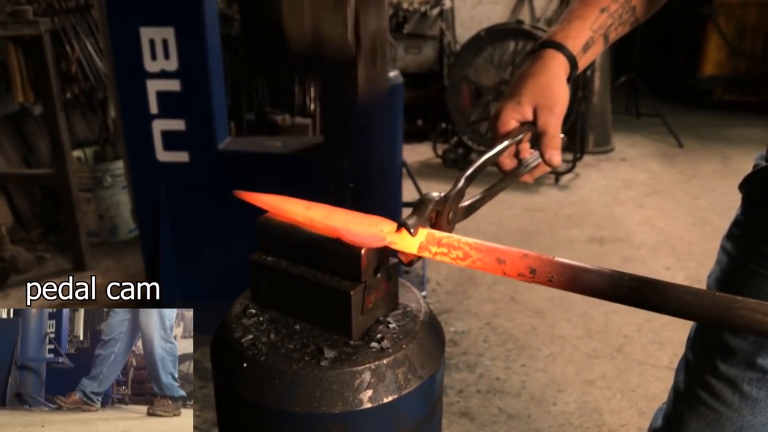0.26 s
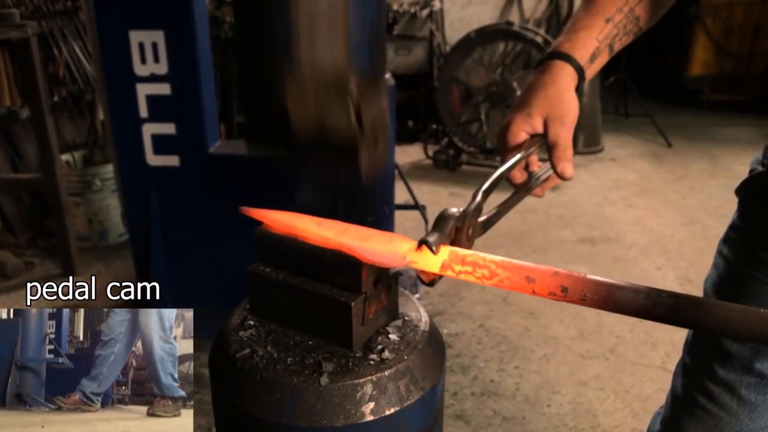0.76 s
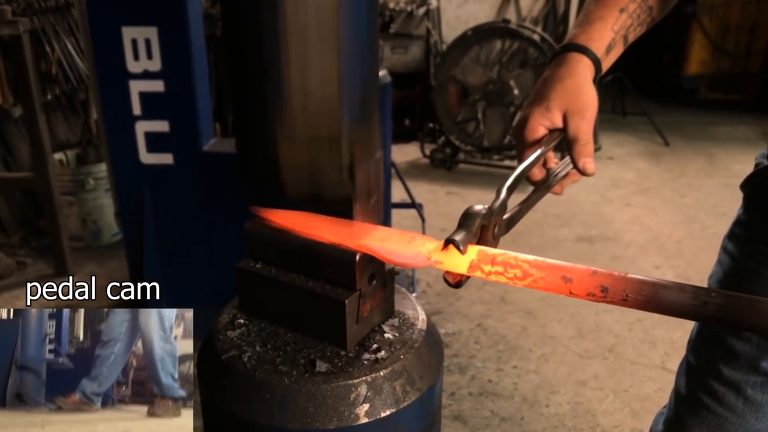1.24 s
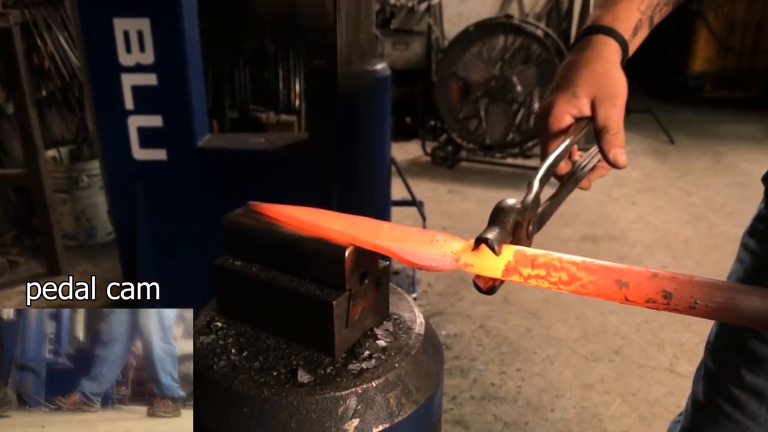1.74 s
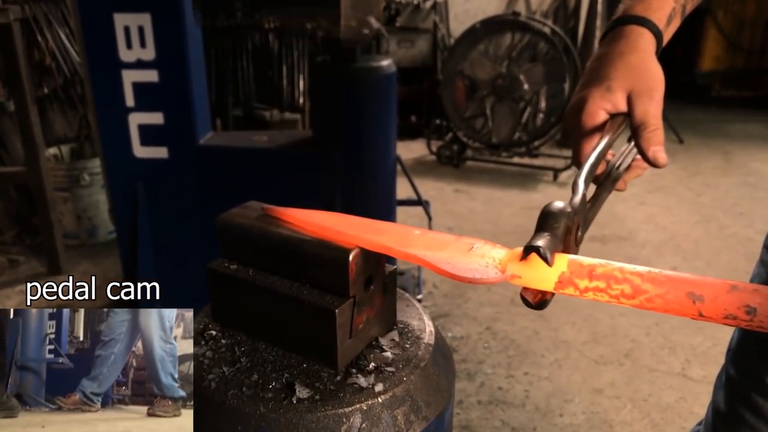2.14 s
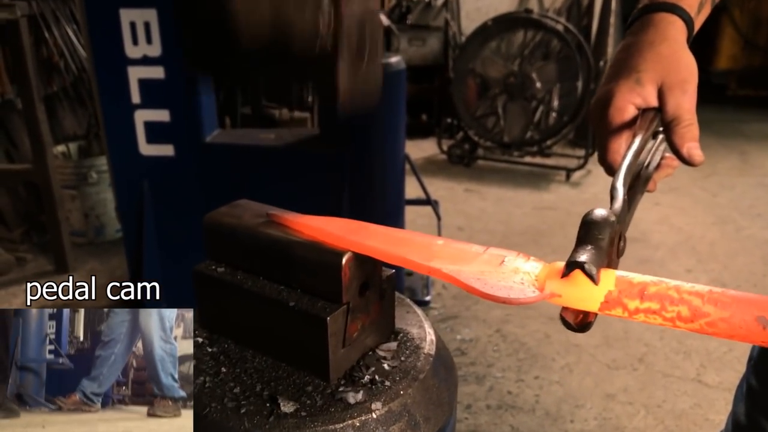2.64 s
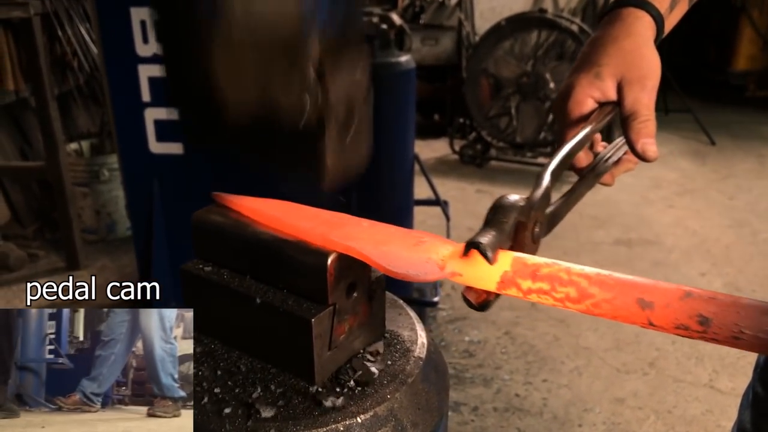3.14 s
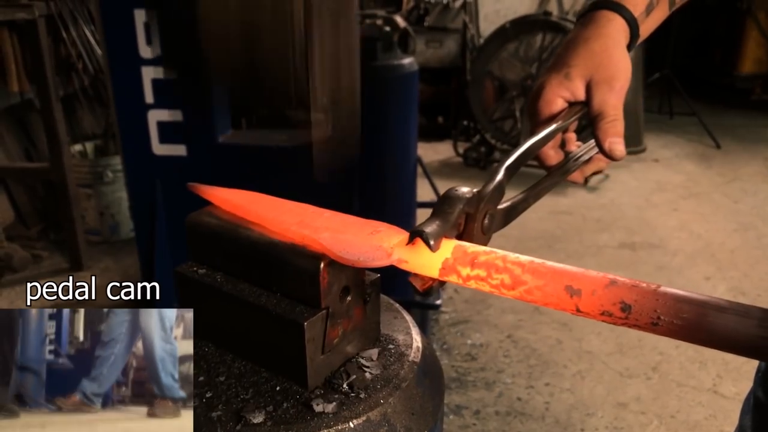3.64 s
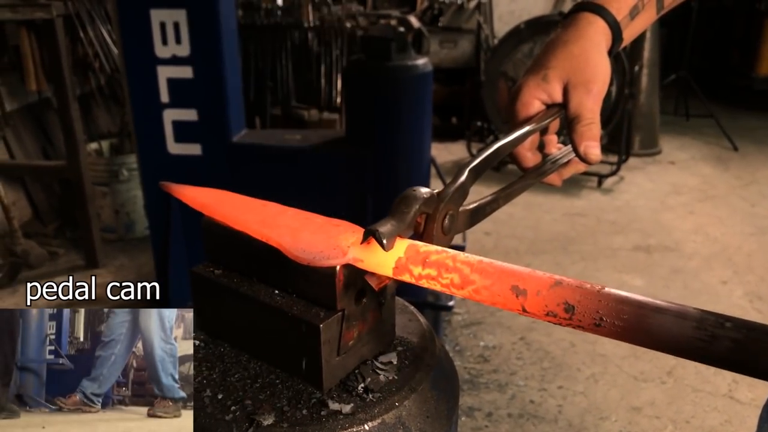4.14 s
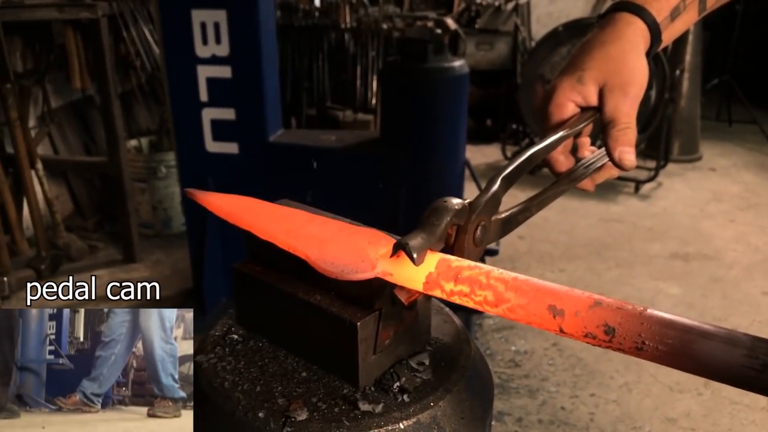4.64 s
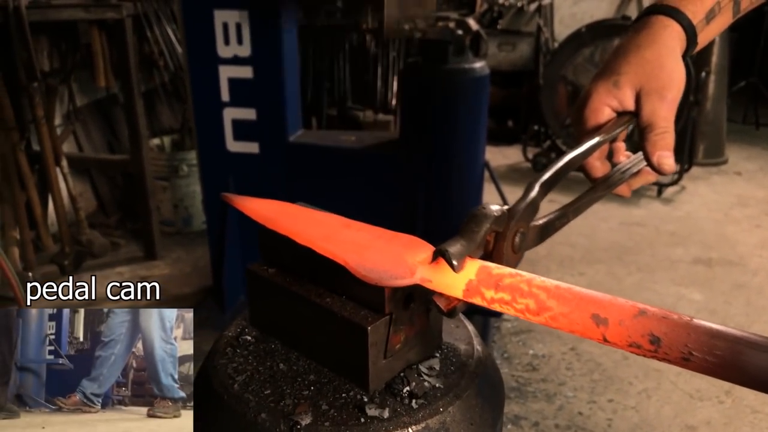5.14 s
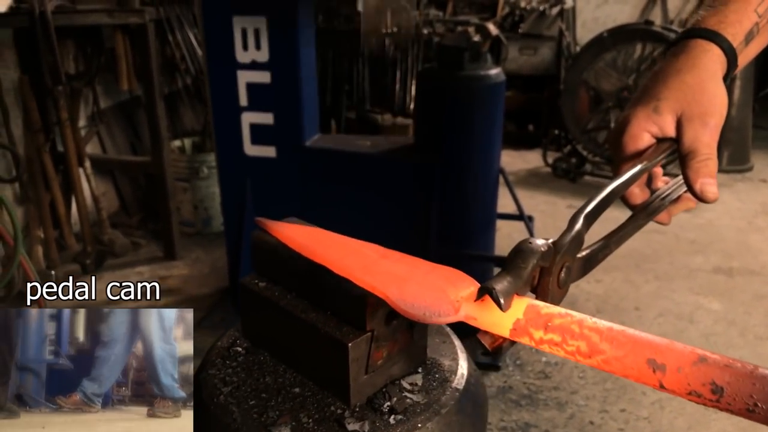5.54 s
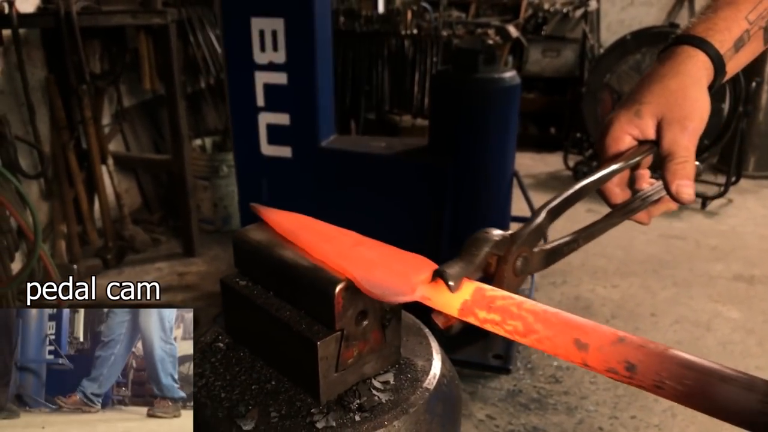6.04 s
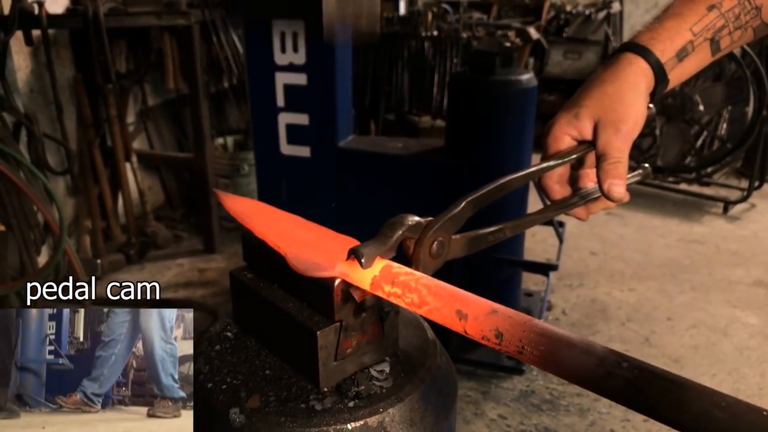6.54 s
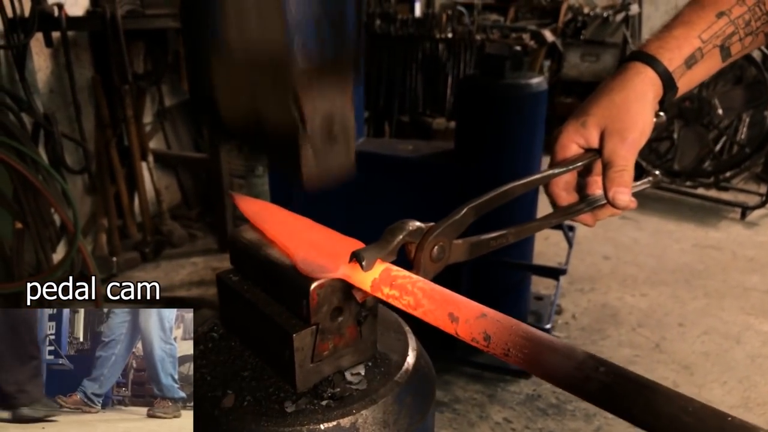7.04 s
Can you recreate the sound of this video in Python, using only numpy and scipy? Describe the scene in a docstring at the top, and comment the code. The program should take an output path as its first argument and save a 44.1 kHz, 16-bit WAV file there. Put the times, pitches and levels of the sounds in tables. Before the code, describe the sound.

Rapid, even clanging blows of a pneumatic forging hammer, with short spits of air and light metal rattles over a motor and fans.

```python
"""Power hammer in a forge

One microphone on the shop floor, near a pneumatic hammer drawing out a hot steel blade, nearly four
blows a second. Each cycle the air valve spits, air hisses as the ram comes down, and the dies crash
together: the frame booms, the anvil block and thin steel parts ring, and blade and tongs rattle.
Behind it the shop reverberates over the steady noise of motor and fans."""
import sys
import numpy as np
from scipy import signal
from scipy.fft import rfft, irfft
from scipy.io import wavfile

SR = 44100
rng = np.random.default_rng(int(sys.argv[2]) if len(sys.argv) > 2 else 0)


def transcribe(signal):
    """Save signal, clipped to [-1, 1], as a 16-bit WAV file at the path in sys.argv[1]."""
    frames = np.atleast_2d(signal).T
    limited = np.clip(frames, -1, 1)
    pcm = np.round(limited * 32767).astype(np.int16)
    wavfile.write(sys.argv[1], SR, pcm)


N = 321472
AGE = np.arange(SR) / SR   # seconds since a contact


def from_db(db):
    """Decibels to gain."""
    return 10 ** (np.asarray(db) / 20)


def fade(t60_s, hold_s=0):
    """Envelope that holds, then dies by 60 dB in t60_s."""
    return from_db(-60 * np.maximum(AGE - hold_s, 0) / t60_s)


def coloured(white, spectrum):
    """Gives unit white noise a spectrum in dB per Hz, rolling off below its first point."""
    size = white.shape[-1]
    hz, db = np.transpose(spectrum)
    bins = np.maximum(np.fft.rfftfreq(size, 1 / SR), 1)
    gain = from_db(np.interp(np.log(bins), np.log(hz), db)) * np.minimum(bins / hz[0], 1) ** 2
    return irfft(rfft(white) * gain, size) * np.sqrt(SR / 2)


def dense_modes(spectrum, repeat_share=0.72, repeat_below_hz=1800, clump_hz=110.3, clump_db=2):
    """One crowd of modes per blow: the lows mostly repeat, the highs change with each contact."""
    hz = np.fft.rfftfreq(SR, 1 / SR)
    same = rfft(rng.standard_normal(SR))
    fresh = rfft(rng.standard_normal((len(BLOWS), SR)))
    # each contact favours other clumps of modes
    favour_db = clump_db * rng.standard_normal((len(BLOWS), 512))
    clumps = from_db([np.interp(hz / clump_hz, np.arange(len(row)), row) for row in favour_db])
    fresh = fresh * clumps / np.sqrt(np.mean(clumps ** 2))
    share = repeat_share / (1 + (hz / repeat_below_hz) ** 2)
    return coloured(irfft(np.sqrt(share) * same + np.sqrt(1 - share) * fresh, SR), spectrum)


def ringing(modes, swell_s, spread_db=1.1):
    """One ring per blow, swelling as the shock spreads; each blow weights the modes differently."""
    shapes = np.array([np.sin(2 * np.pi * hz * AGE) * from_db(db) * fade(t60) for hz, db, t60 in modes])
    weights = from_db(spread_db * rng.standard_normal((len(BLOWS), len(modes))))
    return weights @ shapes * (1 - np.exp(-AGE / swell_s))


def place(times, levels_db, sounds):
    """Lays one sound at each time."""
    out = np.zeros(N + 2 * SR)
    for s, db, sound in zip(times, levels_db, sounds):
        start = max(round(s * SR), 0)
        out[start:start + SR] += from_db(db) * sound
    return out[:N]


# Room tone of the forge: pitch_hz, level_db_per_hz
MACHINERY_SPECTRUM = [(25, -75), (70, -71), (115, -54.5), (190, -60), (280, -63), (380, -84.5), (800, -77),
                      (1300, -74.5), (2500, -78), (6000, -78.5), (10000, -82.5), (13000, -80), (16000, -89)]

def machinery():
    """Motor and fans run steadily in the background."""
    return coloured(rng.standard_normal(N), MACHINERY_SPECTRUM)


# Standing waves of the shop, all around the microphone: pitch_hz, level_db, t60_s
STANDING_WAVES = [(76.5, -37, 0.84), (107.7, -32.5, 0.83), (151.2, -45, 1), (163.5, -30, 0.74),
                  (183.6, -42, 0.56), (210.7, -28, 0.59), (240.7, -36, 0.94), (280, -35.5, 0.83)]

def room_boom():
    """Standing waves build up slowly after each blow and carry over into the next."""
    times, crash_db, _ = np.transpose(BLOWS)
    return place(times, crash_db, ringing(STANDING_WAVES, swell_s=0.024))


# The blade meeting the lower die: pitch_hz, level_db_per_hz
CLACK_SPECTRUM = [(500, -54), (1600, -32.5), (2800, -44), (5500, -43.5), (8000, -56), (15000, -66)]

def clacks(times, level_db):
    """Hot steel is soft, so each contact is a short, dead clack."""
    noise = coloured(rng.standard_normal((len(times), SR)), CLACK_SPECTRUM)
    return place(times, level_db, noise * fade(t60_s=0.043, hold_s=0.002))


# Knocks that reach the microphone clearly between blows: start_s, level_db
BLADE_KNOCKS = [(0.1586, -23), (1.2487, -17), (2.532, -23), (3.317, -24), (4.775, -20.5), (5.0555, -21)]

def blade_and_tongs():
    """Blade and tongs drop back on the die: a few clear knocks, and two light clacks after each blow."""
    knocks = clacks(*np.transpose(BLADE_KNOCKS))
    blows = np.repeat(np.array(BLOWS)[:, 0], 2)
    delay, force = rng.random((len(blows), 2)).T
    rattle = clacks(blows + 0.06 + 0.072 * delay, -33 + 11 * force)
    return knocks + rattle


# Air at the hammer, the valve's spit and the hiss driving the ram: pitch_hz, level_db_per_hz
SPIT_SPECTRUM = [(300, -45), (1300, -38), (2200, -35), (4000, -42), (6000, -34), (7600, -33), (8800, -32.5),
                 (10000, -41), (15500, -42)]
HISS_SPECTRUM = [(30, -68), (250, -65), (500, -78.5), (1400, -68.5), (4000, -81), (7000, -75.5),
                 (8200, -88.5), (8750, -77), (9500, -85), (13000, -83.5), (16000, -95)]

def air_valve(lead_s=0.0447, opening_s=0.003):
    """Between two blows: a short spit as the valve opens, then a hiss while air drives the ram down."""
    blows = np.array(BLOWS)[:, 0]
    times = blows[1:] - lead_s - opening_s
    wait_s = np.diff(blows)
    spit_db = -27.5 + 150 * (wait_s - wait_s.mean())   # a longer wait builds more pressure
    white = rng.standard_normal((len(times), 2, SR))
    opening = np.minimum(AGE / opening_s, 1) ** 2
    spit = coloured(white[:, 0], SPIT_SPECTRUM) * opening * fade(t60_s=0.028, hold_s=opening_s)
    hiss = coloured(white[:, 1], HISS_SPECTRUM) * opening * fade(t60_s=0.08, hold_s=0.047)
    return place(times, spit_db, spit) + place(times, np.zeros(len(times)), hiss)


# How freely the anvil and the thin steel ring: time_s, anvil_db, steel_db
RING_FREEDOM = [(0, 0, -7), (1.4, 0.5, -0.5), (2.7, 1, 2), (3.3, -2.5, 2), (4.37, -4, 6), (4.95, 2.5, 1),
                (5.45, 1.5, 3), (6.55, -3.5, 4), (7.2, -3.5, 3)]

def ring_levels(times):
    """The blade damps the anvil and the thin steel differently as it is moved along the die."""
    s, anvil_db, steel_db = np.transpose(RING_FREEDOM)
    return np.interp(times, s, anvil_db), np.interp(times, s, steel_db)


# The hammer from nearby, part by part from the floor up: pitch_hz, level_db, t60_s
FLOOR_THUD = [(32.7, -26, 0.18), (48.5, -18.5, 0.16), (58.5, -25.5, 0.23)]
FRAME_BOOM = [(116.2, -8.5, 0.2), (127.6, -18, 0.17), (173.4, -17, 0.36), (224.6, -20.5, 0.17),
              (232.9, -12.5, 0.19), (282.8, -18, 0.19), (327.4, -9.5, 0.14), (451, -23, 0.24),
              (523.2, -11.5, 0.15), (562, -25.5, 0.36), (634.4, -24.5, 0.46)]
ANVIL_RING = [(659.1, -6.5, 0.23), (705.4, -17.5, 0.17), (840, -22, 0.15), (883, -10, 0.094),
              (944, -18.5, 0.23), (982.5, -12, 0.36), (1036, -26, 0.41), (1159, -31, 0.3)]
DIE_RING = [(1344, -21, 0.38), (1465, -22, 0.28), (1968, -19.5, 0.16), (2386, -23, 0.15), (3570, -28, 0.2),
            (4218, -20, 0.15), (6760, -45, .3), (8340, -40, 0.3), (8550, -32, 0.3)]
THIN_STEEL_RING = [(1318, -40.5, 1.74), (1592, -38.5, 1.2), (1650, -42.5, 1.55), (1706, -45.5, 1.4),
                   (2120, -36.5, 0.87), (2140, -43, 0.78), (2970, -45.5, 1.1), (3126, -39.5, 1.2),
                   (3250, -48, 1.5), (3980, -44.5, 1.1), (4930, -43.5, 1.5), (5980, -42.5, 0.87),
                   (7420, -39, .5), (15600, -52, .9)]

def hammer_body():
    """Every blow shakes the floor and rings the frame, the anvil block, the dies and thin steel parts."""
    times, crash_db, thud_db = np.transpose(BLOWS)
    anvil_db, steel_db = crash_db + ring_levels(times)
    die_db = 1 + 1.4 * anvil_db   # the dies touch the blade, so their ring swings further
    floor = place(times, thud_db, ringing(FLOOR_THUD, swell_s=0.016))
    frame = place(times, crash_db, ringing(FRAME_BOOM, swell_s=0.0085))
    anvil = place(times, anvil_db, ringing(ANVIL_RING, swell_s=0.012))
    dies = place(times, die_db, ringing(DIE_RING, swell_s=0.0055))
    steel = place(times, steel_db, ringing(THIN_STEEL_RING, swell_s=0.0035))
    return floor + frame + anvil + dies + steel


# Near to far: crack of the dies, clang of the machine, shop reverberation: pitch_hz, level_db_per_hz
CRACK_SPECTRUM = [(100, -49), (500, -44), (1400, -49.5), (3000, -50), (4200, -50), (6000, -52.5),
                  (9000, -53.5), (15000, -54.5)]
CLANG_SPECTRUM = [(25, -56), (120, -54), (400, -50), (750, -49), (1050, -45.5), (1700, -50.5),
                  (2400, -48.5), (3300, -55), (4200, -51.5), (6000, -57), (9000, -58.5), (13500, -63),
                  (16000, -66)]
REVERB_SPECTRUM = [(25, -55), (70, -47), (160, -45), (270, -53.5), (400, -55.5), (780, -58), (1100, -52),
                   (2000, -56.5), (4000, -60), (6000, -63), (10000, -66.5), (13500, -73.5), (16000, -76)]
# Blows of the ram, in front of the microphone: start_s, crash_db, floor_thud_db
BLOWS = [(0.0292, 0.1, 1), (0.3114, -0.5, -3), (0.5899, 0, -2), (0.8613, 0.5, 1), (1.1286, 0, 1),
         (1.3967, 0, -2), (1.6657, 0.5, 2), (1.9323, 0.5, 0), (2.1982, 0.65, -3), (2.463, 0.5, 3),
         (2.7294, 0.7, 6), (2.9953, 0.5, 4), (3.2594, 0.3, 10), (3.5325, 0.5, -2), (3.813, 0.5, 10),
         (4.0917, 0.5, 7), (4.3663, 0, 5), (4.6502, 0.1, -1), (4.928, -0.5, 13), (5.199, -0.5, 6),
         (5.4669, -0.1, 5), (5.7427, -0.1, 1), (6.0231, 0.6, 9), (6.2925, 0.7, -4), (6.57, 0.3, -3),
         (6.8521, 0, 1), (7.1353, 0.2, -4)]

def crash(bright_above_hz=6540):
    """The dies crack, the clang holds level briefly as if through a limiter, the shop reverberates."""
    times, crash_db, _ = np.transpose(BLOWS)
    crack = dense_modes(CRACK_SPECTRUM) * fade(t60_s=0.038, hold_s=0.0014)
    clang = dense_modes(CLANG_SPECTRUM) * fade(t60_s=0.12, hold_s=0.024)
    build_up = 1 - np.exp(-AGE / 0.021)
    reverb = dense_modes(REVERB_SPECTRUM) * fade(t60_s=0.41, hold_s=0.043) * build_up
    crashes = crack + clang + reverb
    # where the anvil rings less, the crash is brighter
    anvil_db, _ = ring_levels(times)
    treble = signal.lfilter(*signal.butter(1, bright_above_hz, "high", fs=SR), crashes)
    treble_gain = from_db(0.21 * (anvil_db.mean() - anvil_db))
    return place(times, crash_db, crashes + (treble_gain[:, None] - 1) * treble)


def scene():
    """The hammer at work over motor and fans, in mono from one spot in the shop."""
    return (machinery() + crash() + hammer_body() + room_boom() + air_valve() + blade_and_tongs())[None]


# Dips in the treble at the microphone: pitch_hz, width_hz, gain_db
TREBLE_DIPS = [(4860, 400, -7.5), (7700, 1200, -3.5), (10430, 1100, -5)]

def record(dry, ceiling=0.97, cutoff_hz=15750):
    """The treble is hollow in three places, the loudest peaks are rounded off, the top is cut."""
    for hz, width_hz, db in TREBLE_DIPS:
        band = signal.lfilter(*signal.iirpeak(hz, hz / width_hz, fs=SR), dry)
        dry = dry + (from_db(db) - 1) * band
    rounded = dry / (1 + (dry / ceiling) ** 10) ** (1 / 10)
    return signal.sosfilt(signal.ellip(12, 0.1, 80, cutoff_hz, fs=SR, output="sos"), rounded)


dry = scene()
out = record(dry)
transcribe(out)
```